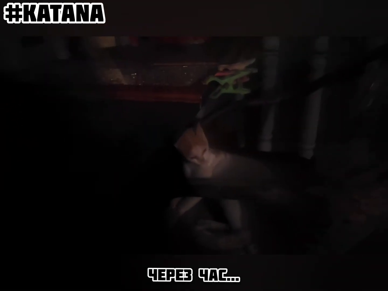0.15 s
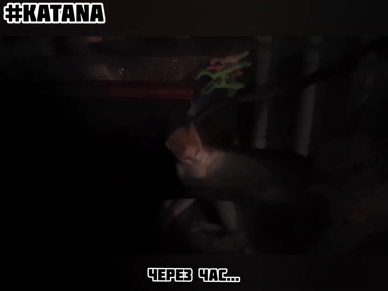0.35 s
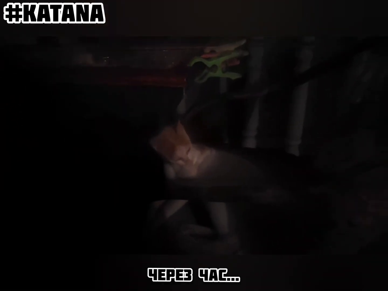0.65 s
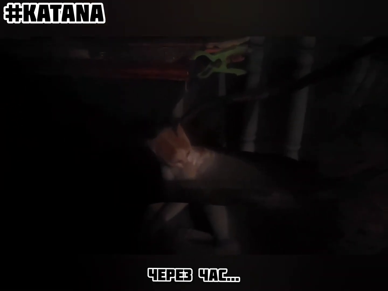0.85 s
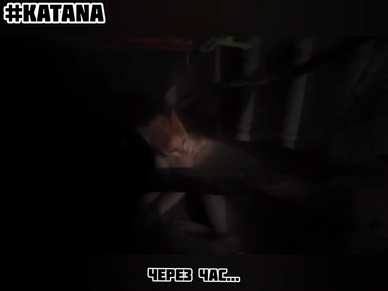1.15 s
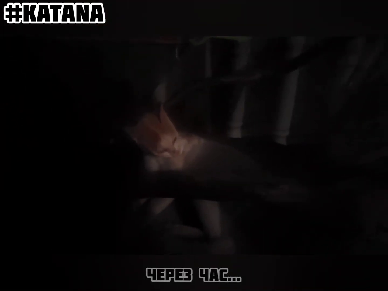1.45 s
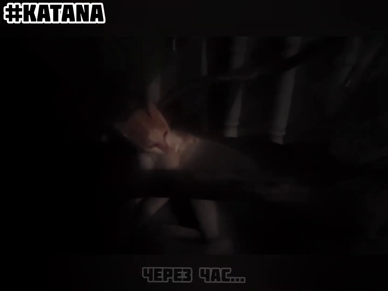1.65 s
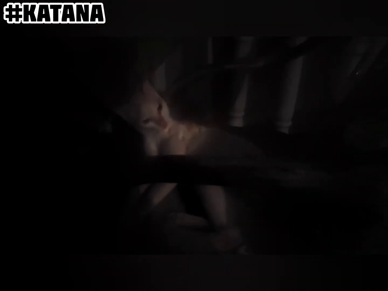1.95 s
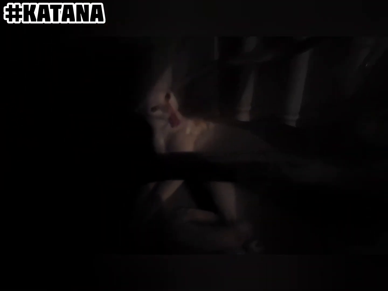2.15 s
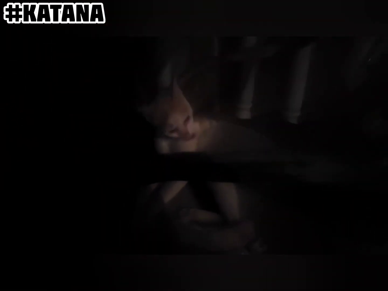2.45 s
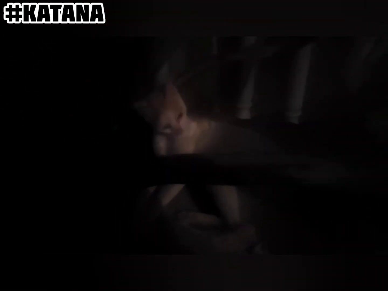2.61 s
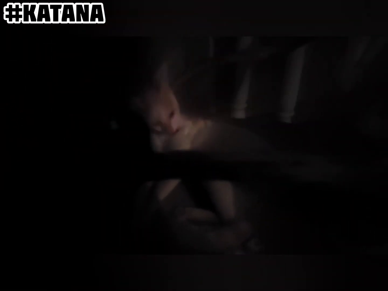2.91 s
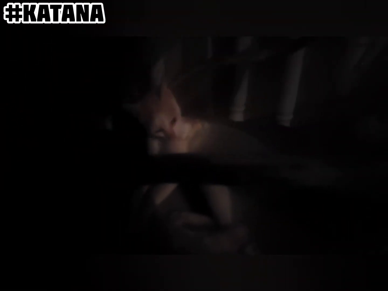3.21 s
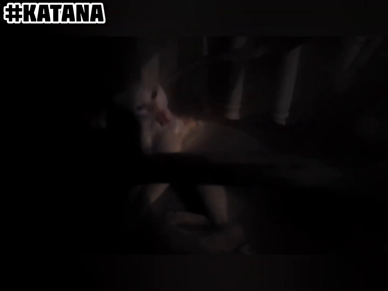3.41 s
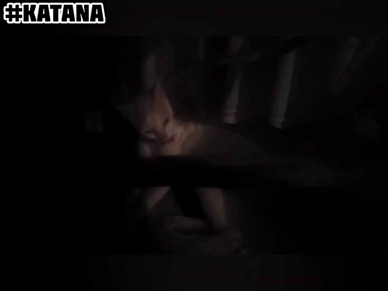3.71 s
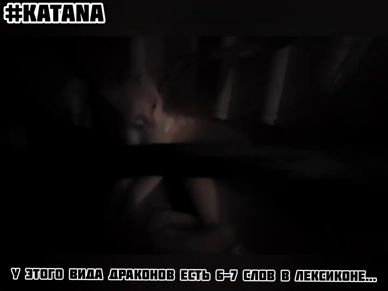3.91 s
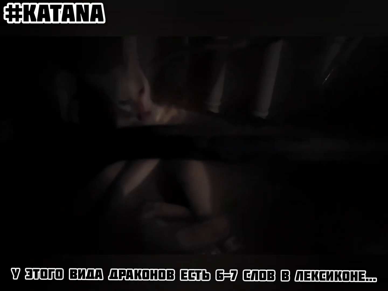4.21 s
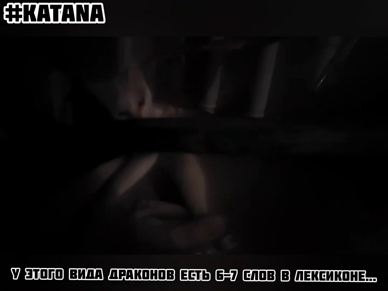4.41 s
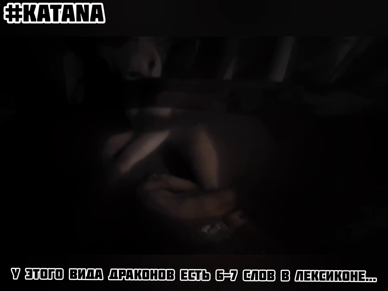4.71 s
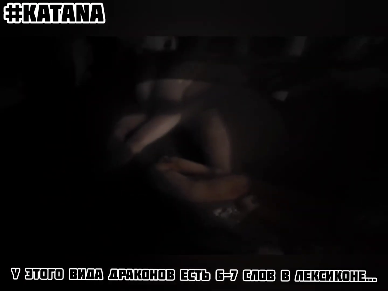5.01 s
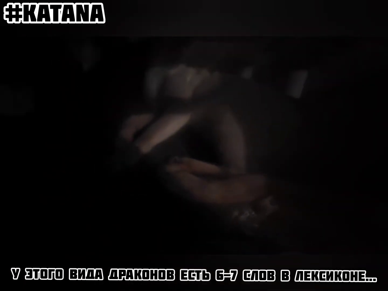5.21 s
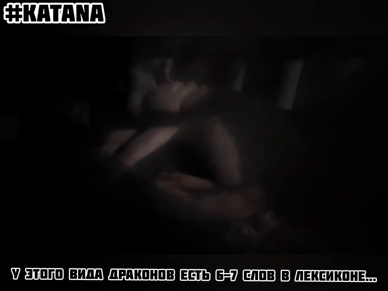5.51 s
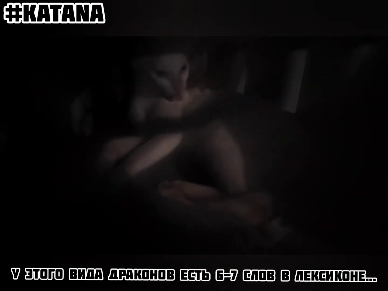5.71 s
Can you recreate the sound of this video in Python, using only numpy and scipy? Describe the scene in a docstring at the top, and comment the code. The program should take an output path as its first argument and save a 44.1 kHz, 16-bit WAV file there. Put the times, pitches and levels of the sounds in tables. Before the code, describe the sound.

A constant high-pitched chorus of crickets and rasping katydids outdoors at night, broken once by a sharp, close click.

```python
"""Warm night with crickets and katydids

Shrill bush crickets and lower tree crickets scrape their wings in chorus over a faint rumble
of night air and a few stirring leaves. Katydids rasp high above in swells, a scraper running
over a toothed file, and one cricket calls in short runs of falling notes.
Once, a sharp click snaps right at the right microphone and overloads it."""
import sys
import numpy as np
from scipy import signal
from scipy.fft import rfft, irfft
from scipy.io import wavfile
from scipy.ndimage import uniform_filter1d

SR = 44100
rng = np.random.default_rng(int(sys.argv[2]) if len(sys.argv) > 2 else 0)


def generate_wav(sig):
    """Save sig (samples, or channels by samples) to the path in sys.argv[1] as 16-bit PCM at SR."""
    pcm = np.round(np.clip(np.atleast_2d(sig).T, -1, 1) * 32767).astype(np.int16)
    wavfile.write(sys.argv[1], SR, pcm)


N = 258205
TIME = np.arange(N) / SR
BINS_HZ = np.maximum(np.fft.rfftfreq(N, 1 / SR), 1)

# wing strokes of the groups in the shrill and far choruses: rate_hz
STROKE_RATES = [18.6, 27.6, 43.1, 54.3, 96.5, 178]


def from_db(db):
    """Decibels to gain."""
    return 10 ** (np.asarray(db) / 20)


def rms_one(x):
    """Scale every channel to rms 1."""
    return x / np.sqrt(np.mean(x ** 2, axis=-1, keepdims=True) + 1e-20)


def fader(rows):
    """One gain curve for each dB column of a (time_s, level_db, ...) table."""
    times_s, *columns = np.transpose(rows)
    return from_db([np.interp(TIME, times_s, level_db) for level_db in columns])


def per_bin(points):
    """Read a (freq_hz, value) table on a log-frequency axis."""
    hz, value = np.transpose(points)
    return np.interp(np.log(BINS_HZ), np.log(hz), value)


def colour(x, curve):
    """Shape x with an EQ curve that falls away steeply past its ends; rms 1."""
    low_cut = np.minimum(1, BINS_HZ / curve[0][0]) ** 8
    high_cut = np.minimum(1, curve[-1][0] / BINS_HZ) ** 12
    return rms_one(irfft(rfft(x) * from_db(per_bin(curve)) * low_cut * high_cut, N))


def drift(rate_hz):
    """Smooth random motion, mostly slower than rate_hz; rms 1."""
    return rms_one(irfft(rfft(rng.standard_normal(N)) / (1 + (BINS_HZ / rate_hz) ** 2), N))


def cycles(rate_hz, wander, wander_hz):
    """Running count of the cycles of a slightly unsteady rhythm."""
    return rng.random() + np.cumsum(rate_hz * (1 + wander * drift(wander_hz))) / SR


def stereo_pair(two, correlation):
    """Mix two unrelated signals, as mid and side, into left and right of a given correlation."""
    mid = np.sqrt(1 + correlation) * two[0]
    side = np.sqrt(1 - correlation) * two[1]
    return np.array([mid + side, mid - side]) / np.sqrt(2)


def panned(pan_db):
    """Left and right gains, the left louder by pan_db."""
    return from_db(np.array([[.5], [-.5]]) * pan_db)


def swells(rows, half_width_s, pan_db):
    """Stereo envelope with a bell-shaped swell for each (peak_s, level_db) row."""
    bells = sum(from_db(db) * np.exp(-((TIME - peak_s) / half_width_s) ** 2) for peak_s, db in rows)
    return panned(pan_db) * bells


def foliage(x, t60_s, wet_db):
    """Leaves and walls scatter a call into a short tail, different at each microphone."""
    age = TIME[:SR]
    tail = rng.standard_normal((2, SR)) * from_db(-60 * age / t60_s) * (age > .004)
    tail /= np.sqrt(np.sum(tail ** 2, axis=1, keepdims=True))
    scattered = signal.fftconvolve(np.atleast_2d(x), tail, axes=1)[:, :N]
    wet = from_db(wet_db)
    return (x + wet * scattered) / np.hypot(1, wet)


def night_air():
    """Distant rumble, alike at both microphones in the bass and wide in the treble."""
    # tone of the air: freq_hz, gain_db
    tone = [(10, 18.5), (40, -4.5), (70, -3), (100, 0), (140, -3.5), (170, 3), (230, 2), (500, -5),
            (800, -11), (1200, -15), (1600, -19), (3000, -25), (5000, -53), (15000, -75)]
    # likeness of left and right: freq_hz, correlation
    likeness = [(30, .5), (200, .8), (550, .55), (1000, .08), (3000, 0)]
    # rumble on the left, then the right: level_db
    levels_db = [
        [-37.3],
        [-39.6],
    ]
    noise = irfft(stereo_pair(rfft(rng.standard_normal((2, N))), per_bin(likeness)), N)
    return from_db(levels_db) * colour(noise, tone)


def leaves(crackles_per_s=550, spread_db=3.5):
    """Dry leaves stir briefly in fine, separate crackles of uneven size."""
    # stirs: peak_s, half_width_s, level_db
    rustles = [(2.5, 0.014, -46), (2.6, 0.02, -48), (4.22, 0.04, -43.5), (4.855, 0.018, -48),
               (4.93, 0.02, -47), (4.985, 0.016, -43.5), (5.21, 0.02, -48)]
    # tone of the leaves: freq_hz, gain_db
    tone = [(180, -32), (500, -2), (1000, 13.5), (1500, -1), (2800, 6), (5000, 6), (9000, -22),
            (13000, -24), (15500, -27)]
    stir = sum(from_db(db) * np.exp(-((TIME - peak_s) / half_s) ** 2) for peak_s, half_s, db in rustles)
    crackles = (rng.random(N) < crackles_per_s / SR) * rng.choice([-1, 1], N)
    sizes = from_db(spread_db * rng.standard_normal(N))
    return stir * colour(crackles * sizes, tone)


def steady(x, span_s=.08, share=.4):
    """Singers keep up their effort: slow chance swells are partly evened out, the fine rattle stays."""
    power = uniform_filter1d(x ** 2, int(span_s * SR), axis=-1)
    return rms_one(x / (power + 1e-9) ** (share / 2))


def swarm(wings, rates_hz, throb_db, correlation):
    """Groups of insects scrape, each at its own stroke rate, and ring the wing resonance."""
    scrapes = 0
    for rate_hz in rates_hz:
        phase = 2 * np.pi * cycles(rate_hz, wander=.0593, wander_hz=2.93)
        scrapes += from_db(throb_db * np.cos(phase)) * rng.standard_normal((2, N))
    return steady(colour(stereo_pair(scrapes, correlation), wings))


def far_swarm():
    """Distant wings blur into an even bed, pitched between the tree and bush crickets."""
    # wing resonance: freq_hz, gain_db
    wings = [(3000, -19), (3450, 0), (3650, 6), (3900, 9), (4300, 3), (4650, -9), (5100, -66)]
    return from_db([[-42.2], [-42.4]]) * swarm(wings, STROKE_RATES, throb_db=5, correlation=.11)


def tree_crickets(churn_db=.8, churn_hz=8):
    """The low chorus of scraping wings; it wavers as singers drop in and out."""
    # chorus level: time_s, left_db, right_db
    levels = [(0.0, -31, -34), (0.9, -32, -36), (0.98, -29, -34), (1.06, -31.5, -36), (1.15, -32, -34.5),
              (2.45, -33, -37), (5.55, -33.5, -34.5), (5.7, -31, -33), (5.85, -30, -35)]
    # wing resonance: freq_hz, gain_db
    wings = [(1500, -31), (1700, -18.5), (1850, -3.5), (1950, 2.5), (2060, 4.5), (2150, -1), (2260, -6.5),
             (2450, -16), (2700, -26), (3100, -91)]
    # wing strokes of each group: rate_hz
    stroke_rates = [34.1, 54.2, 67.6, 116.3, 132.5]
    chorus = fader(levels) * swarm(wings, stroke_rates, throb_db=4, correlation=.25)
    return chorus * from_db(churn_db * np.array([drift(churn_hz), drift(churn_hz)]))


def bush_crickets():
    """Two shrill swarms of scraping wings, one on each side, swelling slowly."""
    # swells of each swarm: time_s, level_db
    left_levels = [(0.13, -31.5), (.3, -30.5), (.6, -29), (.85, -31.2), (1.77, -32), (2.1, -28.5),
                   (2.3, -29.5), (2.6, -29.5), (2.8, -28.5), (3.22, -31), (3.47, -29.5), (3.95, -33),
                   (4.27, -30), (4.46, -29), (4.6, -32.5), (4.85, -31), (5.12, -29.5), (5.27, -27),
                   (5.52, -30.5), (5.8, -27)]
    right_levels = [(0.08, -28), (.22, -26), (.43, -24), (.6, -25), (.85, -26.5), (1.8, -26), (2.07, -23.5),
                    (2.3, -25.4), (2.53, -27), (2.77, -23), (2.95, -24), (3.17, -26.5), (3.4, -25),
                    (3.62, -24), (3.82, -24.5), (3.97, -26.5), (4.33, -22.5), (4.5, -23.5), (4.67, -24.3),
                    (5.85, -26)]
    # wing resonance of each swarm: freq_hz, gain_db
    left_wings = [(5000, -33), (5650, -23.5), (5950, -18.5), (6500, -18.5), (7300, -4), (7600, -1.5),
                  (7800, -3), (8050, 4), (8250, 3.5), (8520, -9), (8780, -8.5), (9100, -12), (9400, -30),
                  (9800, -95)]
    right_wings = [(5000, -43.5), (5700, -23.5), (6000, -15.5), (6550, -17), (6900, -8.5), (7300, 0.5),
                   (7600, 1), (7950, 1.5), (8170, -1), (8400, -16), (9000, -27), (9500, -82)]
    left = fader(left_levels) * swarm(left_wings, STROKE_RATES, throb_db=7, correlation=0)[0]
    right = fader(right_levels) * swarm(right_wings, STROKE_RATES, throb_db=3.5, correlation=0)[1]
    return np.vstack([left, right])


def brief_buzz(flutter_db=3):
    """An insect's wings give one faint, fluttering buzz."""
    # the buzz: peak_s, level_db
    buzz = [(2.61, -54)]
    # wing resonance: freq_hz, gain_db
    wing = [(4450, -16), (4750, 0), (5100, -14)]
    noise = colour(rng.standard_normal((2, N)), wing)
    return swells(buzz, half_width_s=.13, pan_db=0) * from_db(flutter_db * drift(40)) * noise


def file_rasp(wing, tooth_hz, wander, hiss):
    """A scraper runs over the teeth of a file: a train of strikes, mixed with hiss, rings the wing."""
    tooth_phase = cycles(tooth_hz, wander, wander_hz=88) % 1
    strikes = rms_one(np.exp(-((tooth_phase - .5) * SR / tooth_hz) ** 2))
    scattered = foliage(strikes, t60_s=.1, wet_db=-4)
    return colour(scattered + hiss * rng.standard_normal((2, N)), wing)


def sizzling_katydid(trim_db=-4, flicker_db=2):
    """One katydid keeps up a thin, unbroken rasp at the very top."""
    # contour of the sizzle: time_s, relative_db
    contour = [(0.0, -59.5), (4.65, -57.5), (4.81, -56), (4.855, -51), (4.9, -55), (5.2, -55), (5.42, -54),
               (5.55, -56), (5.85, -56.5)]
    # wing resonance: freq_hz, gain_db
    wing = [(10000, -71), (11500, 3.5), (12300, 4.5), (13700, 4.5), (15000, -5)]
    envelope = fader(contour) * panned(3.5) * from_db(trim_db + flicker_db * drift(11))
    return envelope * file_rasp(wing, tooth_hz=280.3, wander=.0043, hiss=.94)


def swelling_katydids(flutter_db=2.8):
    """Near and far katydids rasp in rounded swells; uneven scraper pressure makes them flutter."""
    # the near one, about three swells in two seconds: peak_s, level_db
    near_swells = [(.12, -45.5), (.77, -47), (1.46, -46.5), (2.09, -48), (2.88, -47), (3.53, -45.5),
                   (4.18, -43), (4.84, -46), (5.68, -47)]
    # the far ones, shorter and weaker: peak_s, level_db
    far_swells = [(.21, -53), (.30, -55), (1.03, -54), (1.85, -50), (2.0, -66), (2.52, -51), (2.61, -63),
                  (3.07, -74), (3.27, -55), (3.97, -50.5), (4.69, -50), (4.98, -66), (5.21, -50),
                  (5.43, -56)]
    # wing resonance: freq_hz, gain_db
    wing = [(8000, -1), (9000, 5), (9750, 4), (10450, 2.5), (11100, 3), (11600, -7.5), (12500, -13),
            (15000, -19)]
    near = swells(near_swells, half_width_s=.054, pan_db=6.5)
    far = swells(far_swells, half_width_s=.029, pan_db=10)
    envelope = np.hypot(near, far) * from_db(flutter_db * drift(60))
    return envelope * file_rasp(wing, tooth_hz=348.3, wander=.00293, hiss=.27)


def lone_cricket(note_s=.062, peak_share=.68, top_hz=3320, end_hz=3105, gain_db=-30):
    """Runs of soft notes, one to a wing stroke; each sags in pitch and trails off through the foliage."""
    # notes of five chirps: peak_s, relative_db
    notes = [(0.171, -2), (0.236, -7), (.272, -1.5), (0.331, -7), (.382, -13), (0.419, -10), (1.232, -5),
             (1.3, 2), (1.378, -7), (1.415, -12), (1.51, -17), (2.55, -5.5), (2.609, -7), (2.655, -6),
             (2.713, -5), (3.655, -2), (3.71, -2.5), (3.753, -9), (4.926, -1), (4.993, 0), (5.056, -2),
             (5.122, -5), (5.168, -10), (5.226, -13)]
    waver = 1 + .018 * drift(210)  # the uneven scraper shakes the pitch
    flutter = from_db(2.4 * drift(58))
    song = np.zeros(N)
    for peak_s, relative_db in notes:
        stroke = np.clip((TIME - peak_s) / note_s + peak_share, 0, 1)
        pitch_hz = (top_hz + (end_hz - top_hz) * stroke) * waver
        effort = stroke * np.sin(np.pi * stroke)
        song += from_db(relative_db) * effort * np.sin(2 * np.pi * np.cumsum(pitch_hz) / SR)
    return from_db(gain_db) * foliage(song * flutter, t60_s=.5, wet_db=3)


def click(snap_s=4.1368, top_hz=2690, rest_hz=172, glide_s=.00176, contact_s=.0003):
    """Quick contacts, a knock and a snap whose ring dives to a small thud; hard right."""
    # the snap's fast decay and slower thud: level_db, decay_s
    snap_decays = [(4.5, .00175), (-11, .0115)]
    # modes of the knocked body: pitch_hz, level_db, decay_s
    modes = [(99, -24.5, 0.018), (854, -5, 0.0021), (2470, -12, 0.0016)]
    # tiny ringing contacts: start_s, level_db, pitch_hz
    contacts = [(4.1348, -6, 7160), (4.1351, -14, 4900), (4.1361, -3, 5300), (4.1363, 3.3, 6900),
                (4.1374, 2.5, 7250)]
    age = np.maximum(TIME - snap_s, 0)
    dive_hz = rest_hz + (top_hz - rest_hz) * np.exp(-(age / glide_s) ** 2)
    envelope = sum(from_db(db) * np.exp(-age / decay_s) for db, decay_s in snap_decays)
    snap = envelope * np.sin(2 * np.pi * np.cumsum(dive_hz * (age > 0)) / SR)
    knock = sum(from_db(db) * np.exp(-age / decay_s) * np.sin(2 * np.pi * hz * age)
                for hz, db, decay_s in modes)
    bright_noise = np.diff(rng.standard_normal(N + 1))
    crack = from_db(-9) * (age > 0) * np.exp(-age / .001) * bright_noise
    ticks = np.zeros(N)
    for start_s, level_db, pitch_hz in contacts:
        age = np.maximum(TIME - start_s, 0)
        pulse = age / contact_s * np.exp(1 - age / contact_s)
        ticks += from_db(level_db) * pulse * np.sin(2 * np.pi * pitch_hz * age)
    return np.array([np.zeros(N), snap + knock + crack + ticks])


def overload_duck(x, max_cut_db=2.5, attack_s=.034, recovery_db_per_s=24):
    """Gain curve: an overload turns both channels down a little, then they creep back."""
    over_db = np.clip(20 * np.log10(np.abs(x).max(axis=0) + 1e-9), 0, max_cut_db)
    recovery_db = recovery_db_per_s * TIME
    held_db = np.maximum.accumulate(over_db + recovery_db) - recovery_db
    lag = np.exp(-1 / (attack_s * SR))
    return from_db(-signal.lfilter([1 - lag], [1, -lag], held_db))


def scene():
    """Insects all around, the air, a few leaves and the click."""
    choruses = bush_crickets() + tree_crickets() + far_swarm()
    callers = lone_cricket() + swelling_katydids() + sizzling_katydid() + brief_buzz()
    return choruses + callers + night_air() + leaves() + click()


def record(dry, cutoff_hz=15500):
    """The input ducks after an overload and clips at full scale; the top is cut steeply."""
    clipped = np.clip(dry * overload_duck(dry), -1, 1)
    lowpass = signal.ellip(10, .1, 80, cutoff_hz, fs=SR, output="sos")
    return signal.sosfilt(lowpass, clipped)


dry = scene()
out = record(dry)
generate_wav(out)
```